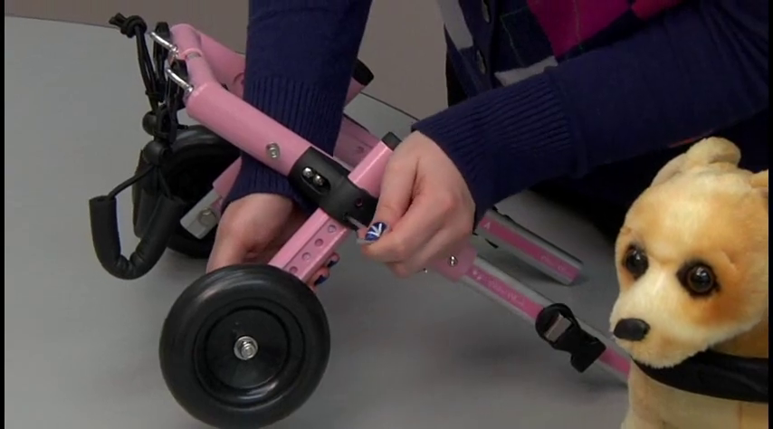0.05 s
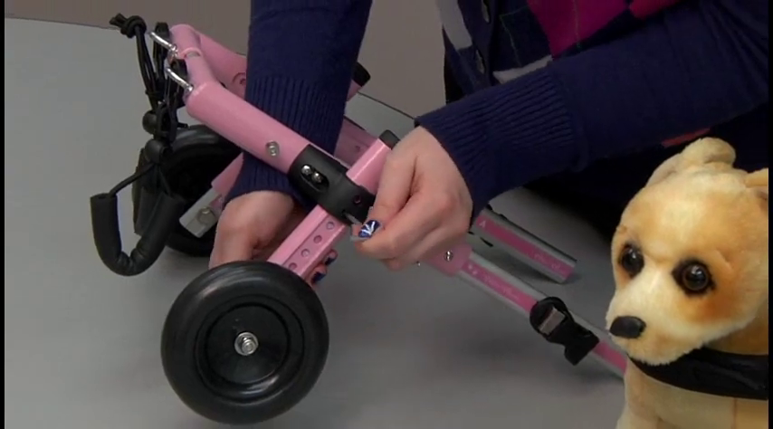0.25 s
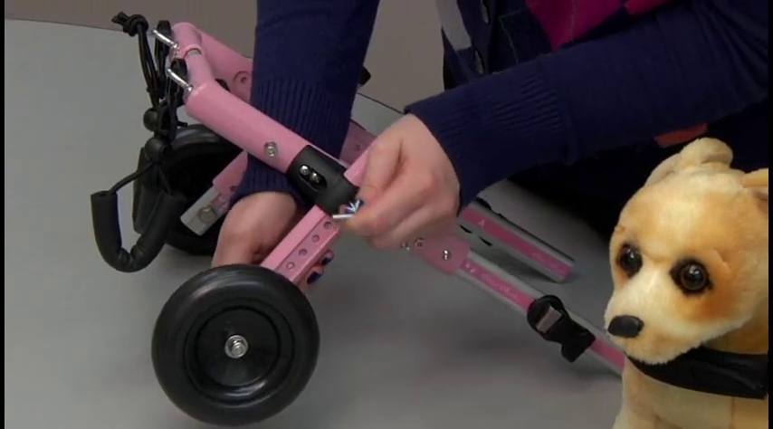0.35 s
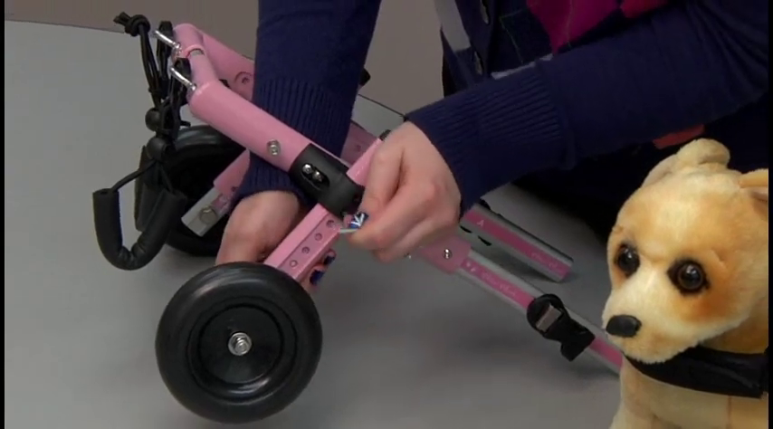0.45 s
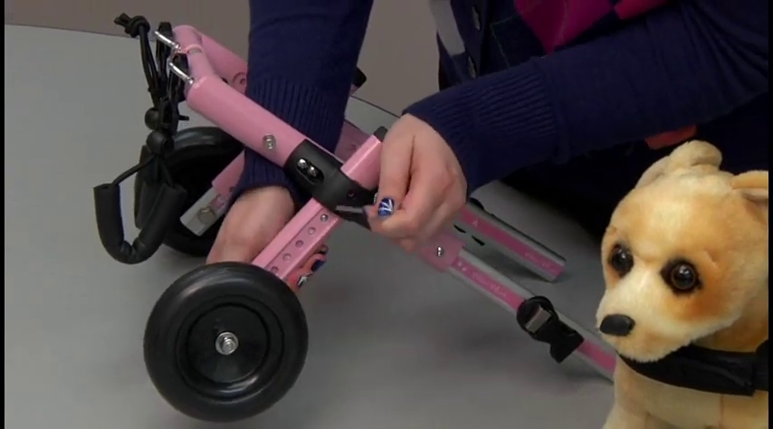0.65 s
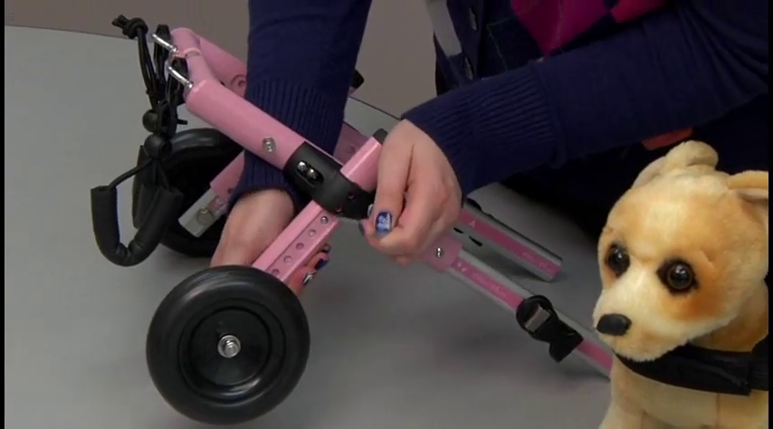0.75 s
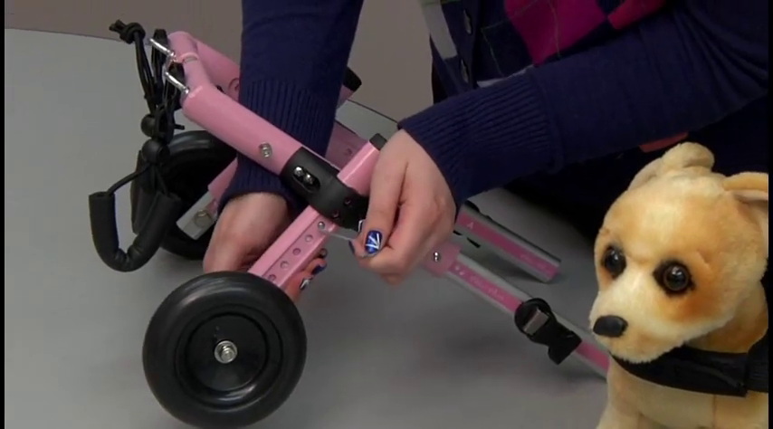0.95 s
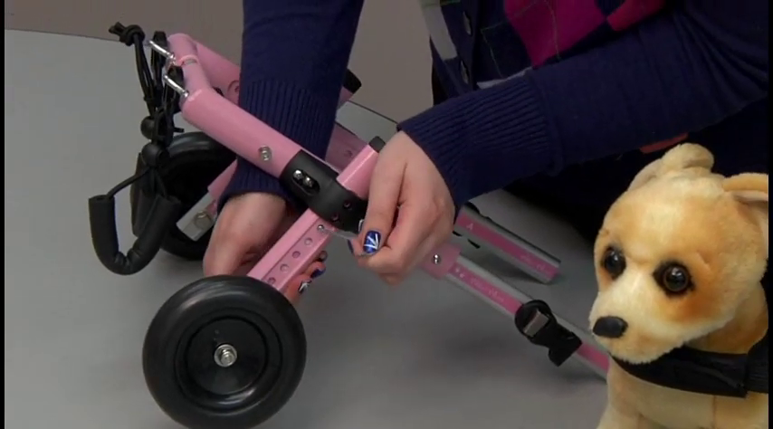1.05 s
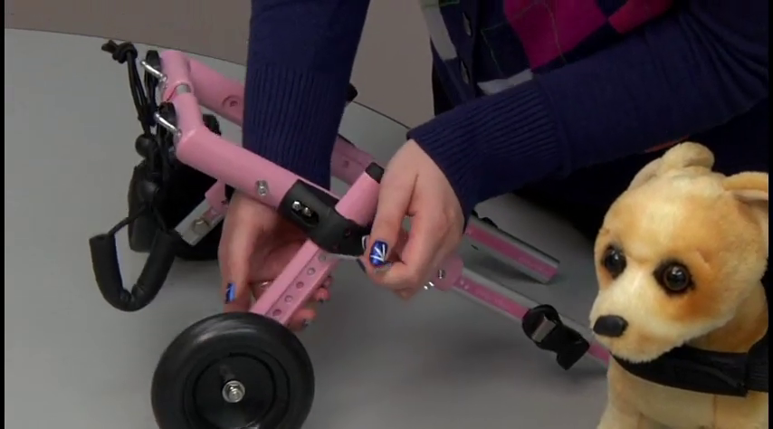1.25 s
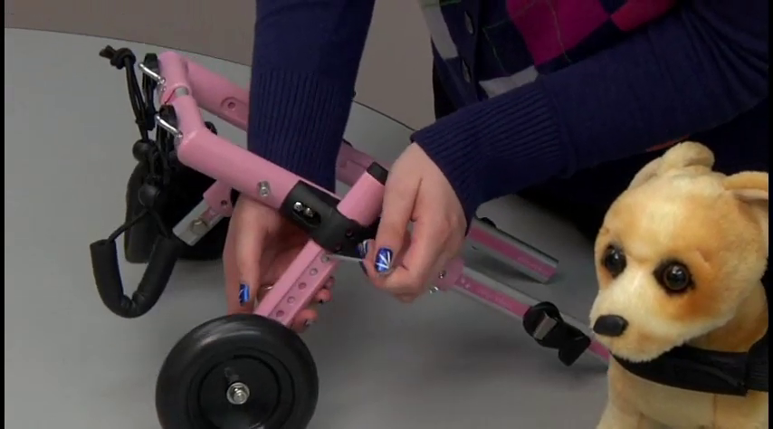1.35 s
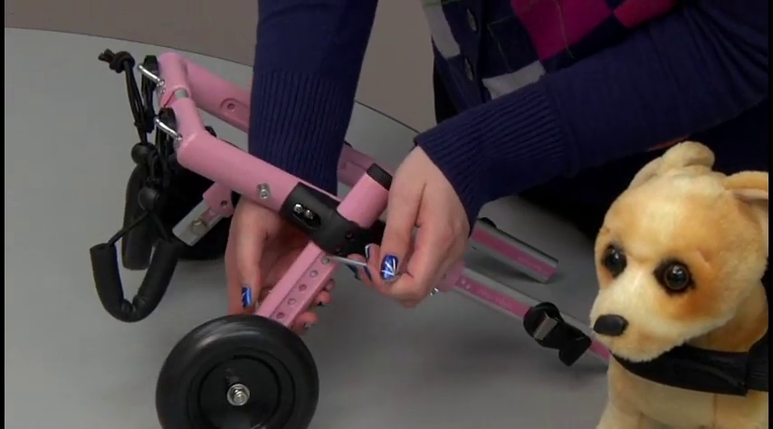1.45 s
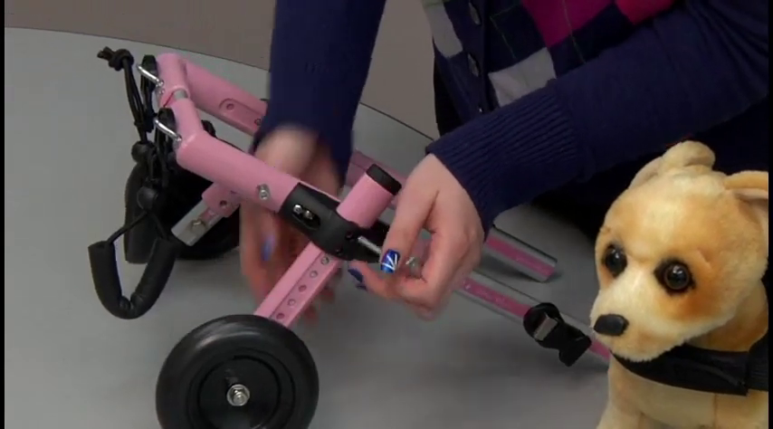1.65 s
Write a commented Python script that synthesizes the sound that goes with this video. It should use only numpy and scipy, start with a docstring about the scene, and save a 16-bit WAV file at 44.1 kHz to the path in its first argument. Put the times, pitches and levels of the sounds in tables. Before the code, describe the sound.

A small metal leg is adjusted by hand, with light clicks and two sharp snaps.

```python
"""On a table in a small room, someone adjusts the sliding metal leg of a small wheeled frame by hand.
A spring button ticks, a plastic clamp knocks, and the tube rubs and scrapes in its sleeve and twice
snaps home. These contacts make the tube and the frame ring, and the room adds a short echo.
Wheel and frame bump on the table. Behind it all lie a low rumble, a faint hum and hiss."""
import sys
import numpy as np
from scipy import signal
from scipy.fft import rfft, irfft
from scipy.io import wavfile
from scipy.ndimage import uniform_filter1d

SR = 44100
rng = np.random.default_rng(int(sys.argv[2]) if len(sys.argv) > 2 else 0)


def put_to_file(sound):
    """Save the sound as 16-bit audio at rate SR, in the file named by the first command-line argument."""
    columns = np.atleast_2d(sound).T  # one column per channel
    safe = np.clip(columns, -1, 1)
    whole_steps = np.round(safe * 32767)
    wavfile.write(sys.argv[1], SR, whole_steps.astype(np.int16))


N = 74970
TIME = np.arange(N) / SR


def leg_snaps():
    """The leg snaps against its stop twice, each time in a few quick hits."""
    # each hit: (time [s], fade time [s], low [dB], middle [dB], high [dB], top [dB], very top [dB])
    hits = [(0.7806, 0.0023, -33, -26, -24, -17, -17.5), (0.7846, 0.0048, -28.5, -34.5, -19.5, -46, -54),
            (0.7932, 0.0024, -24, -22, -24.5, -29, -32), (1.4248, 0.0016, -27, -21.5, -15.5, -28, -34),
            (1.4285, 0.0026, -40, -51, -22, -25.5, -54)]
    return contacts(hits)


def button_clicks():
    """The spring button and the sleeve touch with small clicks."""
    # each click: (time [s], low [dB], middle [dB], high [dB], top [dB], very top [dB])
    clicks = [(0.0338, -35, -37.5, -45.5, -66, -62), (0.082, -59, -46, -55, -73, -54),
              (0.1039, -67, -48.5, -43.5, -37.5, -39.5), (0.1347, -32.5, -38, -40, -48, -34.5),
              (0.226, -60, -51, -51.5, -45, -63), (0.2314, -43, -52, -42, -43, -42.5),
              (0.267, -51, -62, -55.5, -48.5, -40.5), (0.3608, -44, -43, -42, -77, -70),
              (0.4357, -63, -50, -52.5, -70, -76), (0.4688, -32.5, -47, -30.5, -36, -61),
              (0.4924, -48, -35.5, -63, -33.5, -42.5), (0.5018, -29.5, -47, -40, -49, -58),
              (0.6513, -42.5, -44, -41.5, -51, -64), (0.6542, -32.5, -46, -36, -68, -66),
              (0.731, -37.5, -39, -34, -45, -62), (0.736, -44, -41, -34, -52, -62),
              (1.075, -43.5, -50, -55.5, -52, -55), (1.3267, -56, -43, -39.5, -57.5, -71),
              (1.3486, -64, -62, -49, -69, -68), (1.374, -47, -44, -43, -77, -74)]
    fade_s = 0.0024
    return contacts([(s, fade_s, *levels_db) for s, *levels_db in clicks])


def clamp_knocks():
    """The plastic clamp knocks hollowly: a short burst around one pitch."""
    # each knock: (time [s], pitch [Hz], level [dB], fade time [s], spread each way [share of pitch])
    knocks = [(0.0344, 2620, -39, 0.0035, 0.088), (0.1339, 2580, -38.5, 0.0034, 0.22),
              (0.2285, 2880, -63, 0.0011, 0.35), (0.3609, 2180, -35, 0.0014, 0.14),
              (0.467, 2410, -31, 0.0018, 0.2), (0.6501, 2450, -35, 0.0052, 0.17),
              (1.3135, 900, -32.5, 0.0032, 0.12)]
    out = np.zeros(N)
    for s, hz, db, fade_s, spread in knocks:
        add(out, s, from_db(db) * burst(fade_s, hz / (1 + spread), hz * (1 + spread)))
    return out


def tube_scrapes():
    """The tube scrapes in its sleeve: many tiny slips make short, bright strokes."""
    # each stroke: (start time [s], length [s], level [dB])
    strokes = [(0.089, 0.071, -57.5), (0.468, 0.042, -42), (0.757, 0.028, -33), (1.393, 0.022, -46),
               (1.4202, 0.0087, -31.5)]
    # the bright tone of scraping: (pitch [Hz], relative level [dB])
    tone = [(300, 17), (900, 7.5), (2000, 8), (3500, 6), (6000, 4), (8000, -6), (10500, -1), (13500, -12)]
    loudness = np.zeros(N)
    for s, length_s, db in strokes:
        position = 2 * (TIME - s) / length_s - 1   # -1 at the stroke's start, +1 at its end
        loudness += from_db(db) * np.sqrt(np.maximum(1 - position ** 2, 0))
    return loudness * with_tone(slips(per_second=12000), tone)


def frame_rubbing():
    """Hands and leg rub on the frame: fewer slips, with a dull tone."""
    # how loud the rubbing is: (time [s], level [dB])
    loudness = [(0, -52), (0.05, -55), (0.16, -55), (0.25, -61.5), (0.33, -53), (0.44, -57), (0.52, -47),
                (0.6, -70), (0.68, -50), (0.82, -44), (0.885, -55), (0.945, -41), (1.0, -70), (1.1, -61),
                (1.2, -79.5), (1.29, -56), (1.34, -42.5), (1.46, -38.5), (1.56, -67), (1.7, -85)]
    # the dull tone of rubbing: (pitch [Hz], relative level [dB])
    tone = [(80, -23), (170, -16.5), (220, 2), (400, -2), (650, -8.5), (1000, -15), (1600, -28.5),
            (4000, -33.5), (13000, -60)]
    return level_over_time(loudness) * with_tone(slips(per_second=1900), tone)


def hard_blows():
    """Metal hits metal: each blow is one sharp kick that reaches a ringing note a random moment late."""
    # each blow: (time [s], strength [dB])
    blows = [(0.135, -6.5), (0.2305, -12), (0.361, -16), (0.469, -10), (0.494, -13.5), (0.5025, -2.5),
             (0.651, -7), (0.7848, 18), (1.4248, 10.5)]
    latest_s = 0.0016
    out = np.zeros(N)
    for s, db in blows:
        add(out, s + latest_s * rng.random(), from_db([db]))
    return out


def tube_ringing(touches):
    """The tube rings most after hard blows; the strength of its notes changes as it slides out."""
    # the tube's notes: (pitch [Hz], level slid in [dB], level slid out [dB], ring time [s])
    notes = [(934, -0.5, -1.5, 0.016), (1248, -1, 3.5, 0.01), (1916, 2.5, -7, 0.028), (2040, 4.5, -8, 0.27),
             (2924, -3.5, -19, 0.013), (3080, -8.5, -2, 0.029), (3593, -17, 5.5, 0.038),
             (4090, -4.5, -21, 0.027), (5032, -1.5, 12.5, 0.034), (5107, -14, 1, 0.25),
             (5470, -14.5, -1, 0.005), (6560, -7.5, -15, 0.0074), (9180, -27, -2, 0.022),
             (10060, -12, -11, 0.0097)]
    # when the tube slides out: (start [s], end [s])
    slide_s = [1.0, 1.3]
    light_push = from_db(-6.5) * touches   # lighter contacts ring it only weakly
    out = np.zeros(N)
    for hz, in_db, out_db, ring_s in notes:
        strength = from_db(np.interp(TIME, slide_s, [in_db, out_db]))
        out += resonance((light_push + hard_blows()) * strength, hz, ring_s)
    return out


def ringing_metal(touches):
    """The contacts are heard together with the ringing of tube and frame, with some pitches weakened."""
    # the frame's notes: (pitch [Hz], level above the direct sound [dB], ring time [s])
    frame_notes = [(116.3, 10, 0.465), (209.3, 7, 0.28), (320, -5.5, 0.21), (381, -5.5, 0.33),
                   (484.5, 0.5, 0.098), (572, -7, 0.023), (672, 0, 0.083)]
    # pitches the tube hardly gives off: (pitch [Hz], depth of the dip [0-1], width [Hz])
    dips = [(737, 0.54, 67), (1415, 0.41, 500), (4620, 0.62, 170), (7560, 0.3, 920)]
    frame = sum(from_db(db) * resonance(touches, hz, ring_s) for hz, db, ring_s in frame_notes)
    out = touches + tube_ringing(touches) + frame
    for hz, depth, width_hz in dips:
        ring_s = np.log(1000) / (np.pi * width_hz)
        out = out - depth * resonance(out, hz, ring_s)
    return out


def wheel_bumps():
    """Wheel and frame bump on the table: soft thuds, each dying away at its own pitch."""
    # each bump: (time [s], pitch [Hz], level [dB], fade time [s])
    bumps = [(0.467, 262.5, -34.5, 0.016), (0.652, 244, -28.5, 0.0045), (0.782, 410, -11.5, 0.003),
             (0.812, 483, -30, 0.026), (0.833, 117.9, -45, 0.07), (1.422, 126.4, -29, 0.029),
             (1.43, 209.3, -25.5, 0.023), (1.439, 342, -27.5, 0.02), (1.559, 115.5, -41.5, 0.032)]
    rise_s = 0.0019
    out = np.zeros(N)
    for s, hz, db, fade_s in bumps:
        loudness = (1 - np.exp(-TIME / rise_s)) * np.exp(-TIME / fade_s)
        add(out, s, from_db(db) * loudness * np.sin(2 * np.pi * hz * TIME))
    return out


def room_echo(x):
    """The room answers with a short, blurred echo that lasts longest in the bass."""
    # the tone of the echo: (pitch [Hz], level [dB])
    tone = [(100, 0), (300, -1.5), (520, 3.5), (900, 3), (2000, 3), (3300, -4), (7500, -3), (11000, -1),
            (14000, -17)]
    # how long the echo lasts: (pitch [Hz], time to fall by 60 dB [s])
    ring_times = [(100, 0.53), (500, 0.22), (1500, 0.24), (5000, 0.26), (13000, 0.22)]
    delay_s, smooth_hz = 0.0046, 80
    t = TIME[:SR // 2]
    edges_hz = np.geomspace(60, 16000, 10)
    echo = np.zeros(len(t))
    for low, high in zip(edges_hz, edges_hz[1:]):
        ring_s = at_pitch(ring_times, np.sqrt(low * high))
        echo += band(rng.standard_normal(len(t)), low, high) * from_db(-60 * t / ring_s)
    fade_in = np.clip(t / delay_s - 1, 0, 1)
    spectrum = rfft(echo * fade_in, SR)   # one value per Hz
    power = uniform_filter1d(np.abs(spectrum) ** 2, smooth_hz)
    even = spectrum / np.sqrt(power + 1e-3 * power.mean())
    shaped = even * from_db(at_pitch(tone, np.arange(len(power))))
    return signal.fftconvolve(x, irfft(shaped, SR)[:len(t)])[:N]


def background():
    """A low rumble swells and sinks under steady hiss and a faint electric hum."""
    # how loud the rumble is: (time [s], level [dB])
    rumble_loudness = [(0, -44), (0.2, -46), (0.26, -31.5), (0.34, -42), (0.55, -37), (0.75, -42),
                       (1.05, -47.5), (1.25, -40), (1.7, -47)]
    # the tones of rumble and hiss: (pitch [Hz], relative level [dB])
    rumble_tone = [(12, -4), (20, -9), (30, -10), (45, -18.5), (75, -27.5), (130, -39), (400, -68)]
    hiss_tone = [(40, -5.5), (100, 11), (300, -12), (900, -14), (1600, -20.5), (4500, -22), (13000, -25)]
    hiss_db, hum_hz, hum_db = -58.5, 123.9, -63
    rumble = level_over_time(rumble_loudness) * with_tone(rng.standard_normal(N), rumble_tone)
    hiss = from_db(hiss_db) * with_tone(rng.standard_normal(N), hiss_tone)
    hum = from_db(hum_db) * np.sin(2 * np.pi * hum_hz * TIME)
    return rumble + hiss + hum


def contacts(rows):
    """Each contact is a burst with its own strength in five pitch ranges."""
    # borders of the low, middle, high, top and very top ranges: (pitch [Hz])
    edges_hz = [185, 750, 1800, 5800, 10400, 13800]
    out = np.zeros(N)
    for s, fade_s, *levels_db in rows:
        for db, low_hz, high_hz in zip(levels_db, edges_hz, edges_hz[1:]):
            add(out, s, from_db(db) * burst(fade_s, low_hz, high_hz))
    return out


def burst(fade_s, low_hz, high_hz, rise_s=0.00039):
    """Two touching parts chatter and die away, within one pitch range."""
    t = TIME[:8192]
    loudness = np.minimum(t / rise_s, 1) * np.exp(-t / fade_s)
    chatter = rng.choice([-1, 1], len(t)) * loudness
    for _ in range(4):   # even out the pitches, then put the fade back
        even = irfft(np.exp(1j * np.angle(rfft(chatter))))
        chatter = np.sign(even) * loudness
    return unit_level(band(chatter, low_hz, high_hz)) * np.sqrt(np.mean(loudness ** 2))


def slips(per_second, spread_db=1):
    """Rubbing surfaces slip at random moments, in tiny jumps of uneven size."""
    sizes = from_db(spread_db * np.minimum(rng.exponential(1, N), 4))
    directions = rng.choice([-1, 1], N)
    return sizes * directions * (rng.random(N) < per_second / SR)


def resonance(x, hz, ring_s):
    """One ringing note, set off by x, that falls by 60 dB in ring_s seconds."""
    r = from_db(-60 / (ring_s * SR))   # share of the swing left after one sample
    feedback = [1, -2 * r * np.cos(2 * np.pi * hz / SR), r * r]
    return (1 - r * r) / 2 * signal.lfilter([1, 0, -1], feedback, x + 1e-18)


def from_db(db):
    """Turn decibels into a number to multiply by."""
    return 10 ** (np.asarray(db) / 20)


def unit_level(x):
    """Scale a sound to an average (rms) level of 1."""
    return x / np.sqrt(np.mean(x ** 2) + 1e-20)


def at_pitch(rows, hz):
    """Read between the rows of a pitch table, giving each octave equal room."""
    pitches, values = np.transpose(rows)
    return np.interp(np.log(np.maximum(hz, 1)), np.log(pitches), values)


def level_over_time(rows):
    """Join (time [s], level [dB]) points into a loudness curve."""
    return from_db(np.interp(TIME, *np.transpose(rows)))


def band(x, low_hz, high_hz):
    """Keep the pitches between two limits."""
    return signal.sosfilt(signal.butter(3, [low_hz, high_hz], "band", fs=SR, output="sos"), x)


def with_tone(x, tone):
    """Give a steady sound a balance of bass and treble, at an average level of 1."""
    gains = from_db(at_pitch(tone, np.fft.rfftfreq(N, 1 / SR)))
    return unit_level(irfft(rfft(x) * gains, N))


def add(out, s, x):
    """Mix a short sound in at s seconds."""
    i = int(s * SR)
    out[i:i + len(x)] += x[:N - i]


def scene():
    """The contacts and their echo ring the metal; bumps and background are mixed in."""
    snaps, clicks, knocks = leg_snaps(), button_clicks(), clamp_knocks()
    friction = tube_scrapes() + frame_rubbing()
    echo = room_echo(from_db(-3.5) * snaps + from_db(-5.5) * clicks
                     + from_db(-17) * knocks + from_db(-4.5) * friction)
    metal = ringing_metal(snaps + clicks + knocks + friction + echo)
    return (metal + wheel_bumps() + background())[None]


def record(dry):
    """The highest treble is cut off steeply."""
    cutoff_hz = 13200
    return signal.sosfilt(signal.ellip(10, .3, 80, cutoff_hz, fs=SR, output="sos"), dry)


dry = scene()
out = record(dry)
put_to_file(out)
```